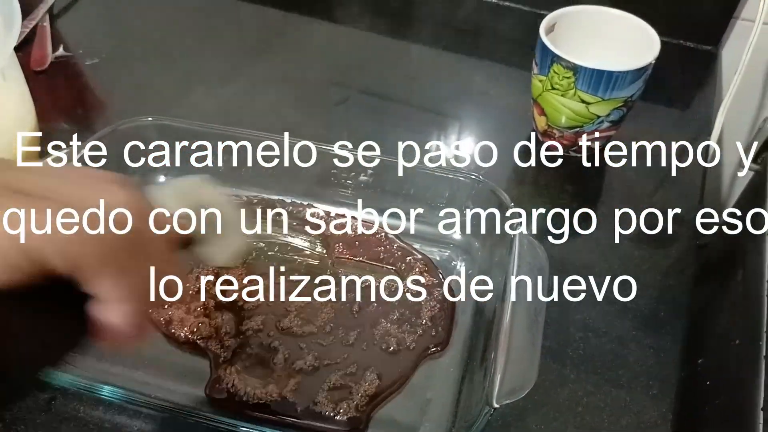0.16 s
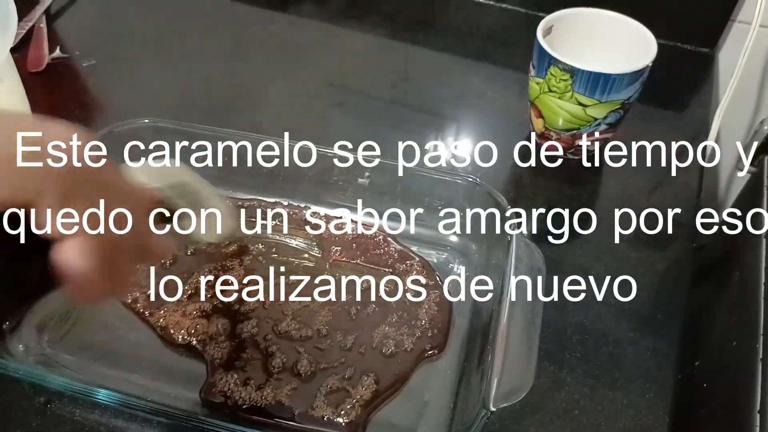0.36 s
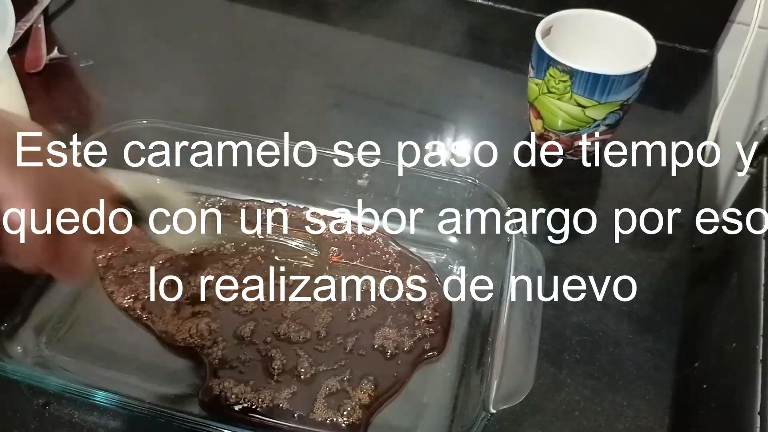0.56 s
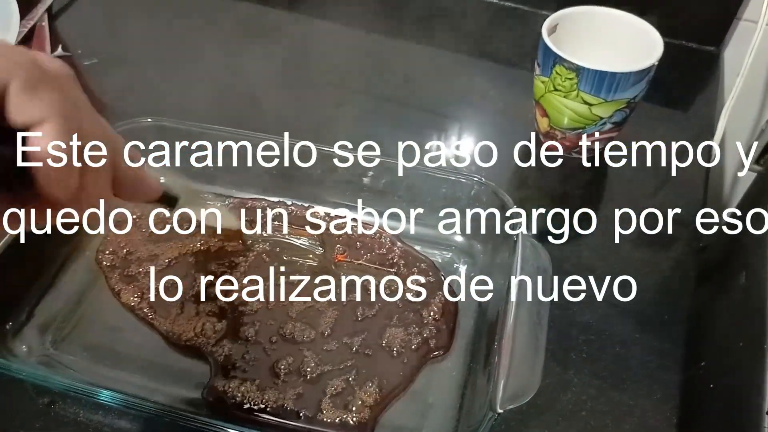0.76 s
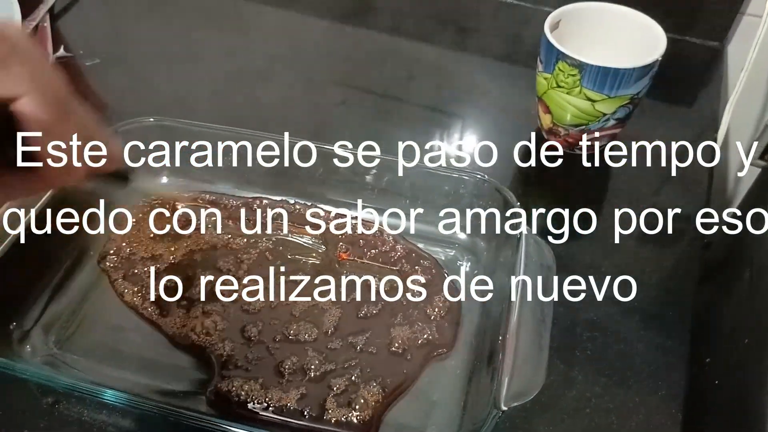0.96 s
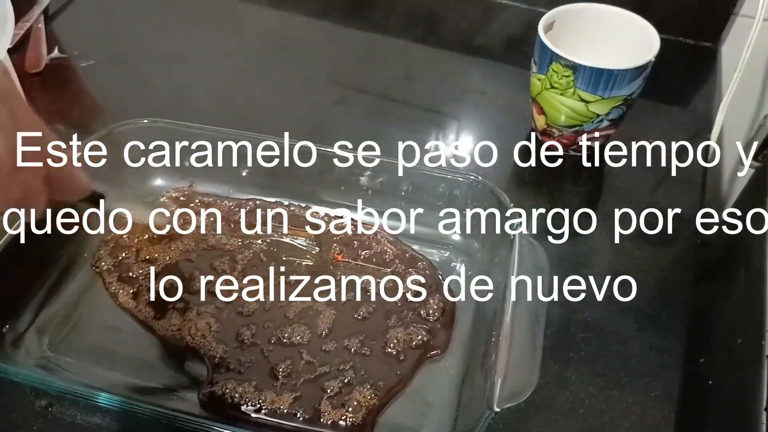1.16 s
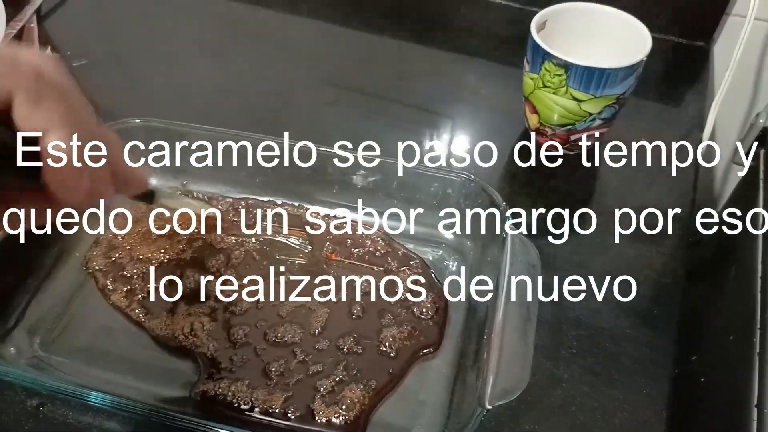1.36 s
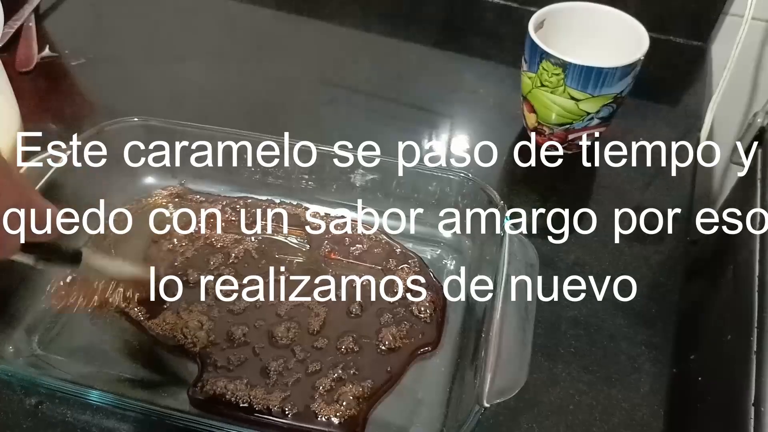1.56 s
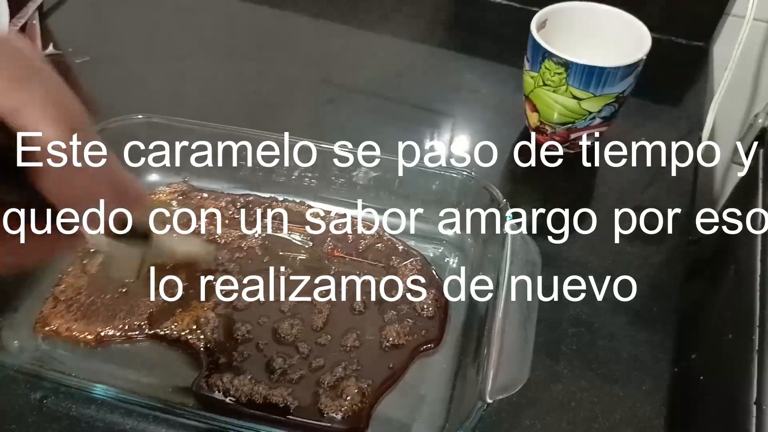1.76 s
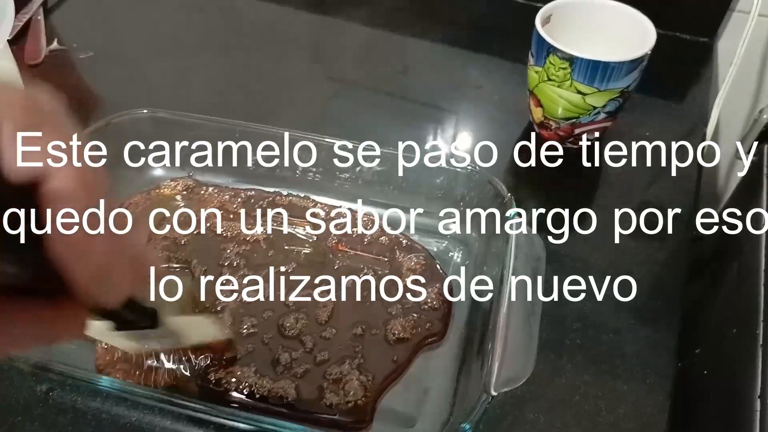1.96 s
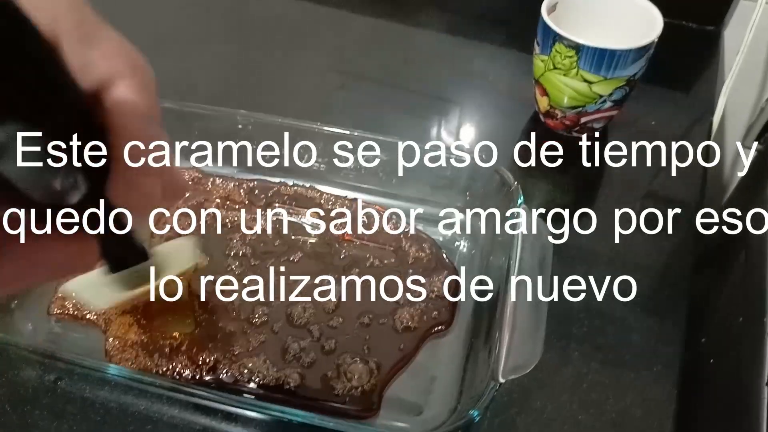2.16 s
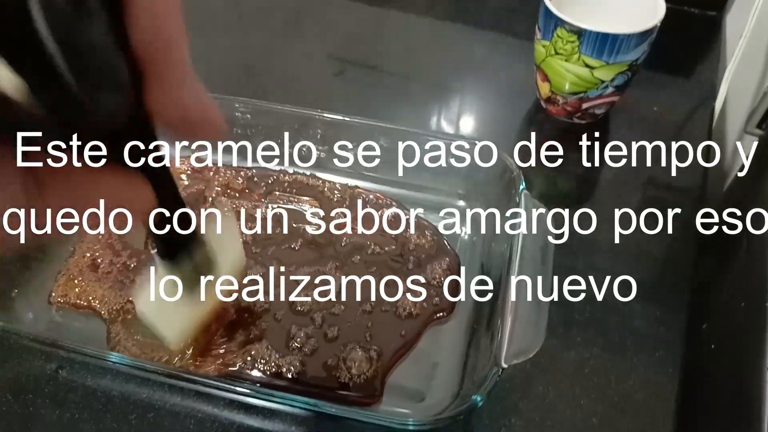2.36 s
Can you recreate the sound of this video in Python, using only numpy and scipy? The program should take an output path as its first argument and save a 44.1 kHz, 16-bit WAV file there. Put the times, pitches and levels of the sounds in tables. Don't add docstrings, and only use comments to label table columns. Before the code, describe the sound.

A spatula scrapes sticky caramel in a glass dish, with one loud early knock on the counter

```python
import sys
import numpy as np
from scipy import signal
from scipy.fft import rfft, irfft, next_fast_len
from scipy.io import wavfile
from scipy.ndimage import uniform_filter1d, map_coordinates

SR = 44100
rng = np.random.default_rng(int(sys.argv[2]) if len(sys.argv) > 2 else 0)


def magnitude_from_level(level_db):
    exponent = np.asarray(level_db, float) / 20
    return 10 ** exponent


def store_wav(level_fs):
    pcm = np.round(np.clip(np.atleast_2d(level_fs), -1, 1) * 32767)
    wavfile.write(sys.argv[1], SR, pcm.T.astype(np.int16))


N = 110250


def unit(x):
    return x / np.sqrt(np.mean(x ** 2) + 1e-20)


def seconds(length):
    return np.arange(length) / SR


def decay(t, t60):
    return magnitude_from_level(-60 * np.maximum(t, 0) / t60)


def along(points, hz):
    f, v = np.transpose(points)
    return np.interp(np.log(hz + 1), np.log(f + 1), v)


def colour(points):
    return lambda hz: magnitude_from_level(along(points[:-1], hz))


def wobble(rate_hz):
    knots = rng.standard_normal(int(N * rate_hz / SR) + 4)
    return map_coordinates(knots, [np.arange(N) * rate_hz / SR])


def filtered(x, response):
    m = next_fast_len(len(x) + 8192)
    return irfft(rfft(x, m) * response(np.fft.rfftfreq(m, 1 / SR)), m)[:len(x)]


def peak(f, centre, width):
    return 1j * f * width / (centre * centre - f * f + 1j * f * abs(width))


def add(track, start_s, sound):
    part = track[max(round(start_s * SR), 0):][:len(sound)]
    part += sound[:len(part)]


def streaky(x, depth_db):
    z = signal.stft(np.pad(x, (0, 512)), nperseg=512)[2]
    field = uniform_filter1d(rng.standard_normal(z.shape), 2, 0)
    field = uniform_filter1d(field, 22, 1)
    return signal.istft(z * magnitude_from_level(depth_db * unit(field)), nperseg=512)[1][:len(x)]


# (frequency [Hz], density [dB per Hz])
RUB_SPECTRUM = [(400, 5), (700, 4), (1300, -0.5), (2600, 3), (4500, -3), (6500, -5.5), (8000, -17),
                (13500, -6.5), (20000, -17)]


def rubbing():
    grain_per_s, spread_db, grain_db, flutter_db, streak_db = 300, 3, -3, 1.1, 0.6 * 4.5
    size_db = spread_db * np.minimum(rng.exponential(size=N), 2)
    grains = (rng.random(N) < grain_per_s / SR) * magnitude_from_level(size_db)
    grains = np.convolve(grains, magnitude_from_level(-np.arange(90) * 0.33))[:N] * rng.standard_normal(N)
    friction = rng.standard_normal(N) + magnitude_from_level(grain_db) * unit(grains)
    flutter = magnitude_from_level(flutter_db * (wobble(40.17) + wobble(130)))
    return streaky(filtered(friction, colour(RUB_SPECTRUM)) * flutter, streak_db)


# (start [s], rise [s], hold [s], level [dB], lowest frequency [Hz])
STROKES = [(0, 0.027, 0.026, -55.5, 2040), (0.133, 0.016, 0.011, -58, 1970),
           (0.153, 0.0018, 0.032, -46, 2040), (0.163, 0.013, 0.026, -46.5, 1390),
           (0.186, .02, 0.012, -48.5, 900), (0.415, 0.034, 0.29, -59.5, 2050),
           (0.825, 0.026, 0.03, -51.5, 1700), (0.899, 0.013, 0.1, -48, 1300),
           (1.025, 0.029, 0.013, -47, 1270), (1.123, 0.007, 0.043, -41.5, 1320),
           (1.259, 0.041, 0.062, -59, 2200), (1.409, 0.0072, 0.003, -48.5, 1530),
           (1.494, 0.009, 0.015, -46, 585), (1.514, 0.003, 0.082, -38, 1390),
           (1.516, 0.025, 0.079, -40, 507), (1.675, 0.01, 0.11, -56.5, 1910),
           (1.846, 0.029, 0.17, -52, 2170), (2.329, 0.015, 0.11, -69.5, 704),
           (1.953, 0.012, 0.076, -50.5, 1300), (2.105, 0.034, 0.17, -64, 1996),
           (2.321, 0.0052, 0.013, -54, 1420)]


def scrape():
    release_t60, linger_t60, linger_db, linger_low_hz, steepness = 0.29, 0.76, -25, 2000, 6.7
    rub = rubbing()
    out, t = np.zeros(N), seconds(SR * 3 // 4)
    for start_s, rise_s, hold_s, db, low_hz in STROKES:
        piece = np.pad(rub, (0, len(t)))[max(round(start_s * SR), 0):][:len(t)]

        def above(hz):
            return filtered(piece, lambda f: 1 / np.sqrt(1 + (hz / (f + 1)) ** (4 * steepness)))

        after_s = t - rise_s - hold_s
        stroke = above(low_hz) * decay(after_s, release_t60)
        linger = above(max(low_hz, linger_low_hz)) * magnitude_from_level(linger_db) * decay(after_s, linger_t60)
        attack = np.clip(t / max(rise_s, 0.002), 0, 1)
        add(out, start_s, magnitude_from_level(db) * attack * (stroke + linger) / np.std(rub))
    return out


# (start [s], length [s], frequency [Hz], width [Hz], level [dB])
SINGS = [(0.0, 0.04, 2710, 470, -69), (0.179, 0.059, 2570, 92, -47), (0.463, 0.31, 2947, 140, -60.5),
         (.5, 0.14, 2683, 100, -64.5), (.58, 0.12, 1668, 68, -71.5), (.34, 0.1, 3790, 60, -57.5),
         (1.39, 0.1, 1200, 130, -75.5), (0.551, 0.18, 2340, 56, -62), (0.592, 0.18, 4330, 850, -65.5),
         (.72, 0.12, 6800, 60, -81.5), (0.848, 0.23, 1760, 130, -56.5), (0.866, 0.043, 3330, 850, -49),
         (0.912, 0.029, 2264, 390, -44.5), (.915, 0.22, 631, 98, -57.5), (1.521, .04, 2180, 670, -46),
         (1.545, 0.019, 3300, 490, -36.5), (1.112, 0.035, 1767, 93, -49.5), (1.199, 0.13, 614, 40, -60),
         (1.135, 0.04, 2740, 1000, -48), (1.712, 0.017, 694, 62, -69), (0.574, 0.046, 726, 100, -65.5),
         (1.32, 0.036, 1536, 13, -74), (1.421, 0.26, 614, 78, -61), (1.69, 0.16, 1520, 78, -68.5),
         (2.03, 0.045, 1490, 50, -70.5), (1.852, 0.077, 2640, 220, -62), (1.939, 0.16, 623, 95, -75),
         (1.968, 0.021, 988, 93, -61), (1.969, 0.036, 1630, 43, -57.5), (2.1, 0.13, 2840, 370, -63.5),
         (2.146, 0.025, 2003, 20, -67), (2.208, 0.17, 2042, 30, -69), (2.34, 0.1, 609, 55, -64),
         (2.426, 0.06, 320, 74, -65.5), (0, .2, 306, 75, -76), (1.401, 0.13, 310, 60, -76),
         (1.501, 0.15, 1115, 540, -52.5)]


def singing():
    edge_s = 0.029
    out, t = np.zeros(N), seconds(SR * 3 // 4)
    for start_s, length_s, hz, width_hz, db in SINGS:
        tone = filtered(rng.standard_normal(len(t)), lambda f: peak(f, hz, width_hz) ** 2)
        shape = np.clip(t / edge_s, 0, 1) * decay(t - length_s, 8 * edge_s)
        add(out, start_s, magnitude_from_level(db) * shape * tone / np.std(tone[t < length_s]))
    return out


# (time [s], peak level [dB], frequency [Hz])
SLIPS = [(0.894, -67.5, 623), (0.922, -47, 649), (0.955, -44.5, 622), (0.982, -40.5, 621),
         (1.021, -36.5, 651), (1.081, -48, 675), (1.112, -54, 690), (1.168, -66, 674), (1.2, -63, 580),
         (1.23, -59, 629), (1.271, -53, 615), (1.298, -52.5, 671), (1.4, -79, 624)]


def slips():
    rise_s, t60 = 0.008, 0.1
    out, t = np.zeros(N), seconds(SR // 4)
    swell = magnitude_from_level(6.5) * decay(t, t60) * (1 - np.exp(-(t / rise_s) ** 2))
    for time_s, db, hz in SLIPS:
        add(out, time_s - rise_s, magnitude_from_level(db) * swell * np.sin(2 * np.pi * hz * t))
    return out


def crackle_burst():
    t = seconds(SR // 20)
    return np.diff(rng.standard_normal(len(t) + 1)) * decay(t, 0.005)


# (time [s], peak level [dB], pitch [Hz])
SNAPS = [(0.0643, -42, 3150), (0.1539, -32, 3020), (0.1614, -32, 2400), (0.189, -28, 2510),
         (0.21, -33, 3900), (0.8525, -39, 3160), (0.8804, -38, 3200), (0.9194, -37, 2210),
         (0.9382, -29, 2230), (1.0519, -27, 1800), (1.1242, -29, 1800), (1.1437, -24, 3130),
         (1.2979, -44, 2960), (1.4121, -40, 2880), (1.5238, -25, 2330), (1.5319, -22, 2440),
         (1.5484, -19, 1500), (1.5814, -25, 2770), (1.582, -25, 4000), (1.6254, -28, 3300),
         (1.597, -26, 1700), (1.065, -33, 1800), (1.699, -42, 2500), (1.7379, -42, 3220),
         (1.7464, -46, 1470), (1.9419, -32, 3030), (2.142, -40, 2750), (2.1977, -47, 3020),
         (2.2311, -48, 2540), (1.0324, -36, 2190), (.8877, -41, 1780), (1.607, -28, 3600),
         (2.2974, -48, 2010), (2.3291, -40, 2660), (2.3869, -46, 2240)]


def snaps():
    rise_cycles, t60_cycles, lag_s, gain_db, crack_db = 1.2, 30, 0.0005, 3, -16
    out, t = np.zeros(N), seconds(SR // 20)
    for time_s, db, hz in SNAPS:
        rise = np.sin(np.pi / 2 * np.clip(t * hz / rise_cycles, 0, 1)) ** 2
        ring = np.sin(2 * np.pi * hz * t) * decay(t, t60_cycles / hz) * rise
        add(out, time_s + lag_s, magnitude_from_level(db + gain_db) * (ring + magnitude_from_level(crack_db) * crackle_burst()))
    return filtered(out, lambda f: peak(f, 3700, 5500) * peak(f, 3700, 6500))


def bubble_ticks():
    ticks_per_s, level_db, spread_db = 45, -66, 3.68
    ticks = (rng.random(N) < ticks_per_s / SR) * magnitude_from_level(level_db + spread_db * rng.standard_normal(N))
    return filtered(np.convolve(ticks, crackle_burst())[:N], lambda f: peak(f, 9000, 12000) ** 2)


# (time [s], peak level [dB], centre frequency [Hz])
PRICKS = [(.0655, -48, 5500), (.4294, -40, 5400), (.583, -49.5, 11000), (.9555, -34, 13160),
          (.977, -33.5, 13940), (.984, -41.5, 9000), (1.0155, -42, 6000), (1.051, -60, 13000),
          (1.1262, -32, 5860), (1.1318, -42, 6460), (1.165, -46, 12170), (1.414, -47, 9060),
          (1.423, -44, 11860), (1.70, -36, 4460), (1.709, -40.5, 4000), (1.739, -42, 5360),
          (1.847, -59, 12150), (2.03, -49.5, 7360), (2.046, -44, 10930), (2.14, -62.5, 5960),
          (2.24, -55, 10900), (2.2985, -49.5, 11000), (2.34, -49, 11000), (2.39, -54, 10900)]


def pricks():
    t60, relative_width = 0.008, 0.6
    out, t = np.zeros(N), seconds(SR // 30)
    for time_s, db, hz in PRICKS:
        noise = rng.standard_normal(len(t)) * decay(t, t60)
        burst = filtered(noise, lambda f: peak(f, hz, relative_width * hz) ** 2)
        add(out, time_s, magnitude_from_level(db) * burst / np.abs(burst).max())
    return out


# (frequency [Hz], density [dB per Hz])
THUD_SPECTRUM = [(35, -51.5), (70, -10.5), (170, -6.5), (300, -15.5), (700, -6), (1050, -18.5), (3000, -24),
                 (6500, -27.5), (8000, -43), (20000, -50)]
# (frequency [Hz], t60 [s])
KITCHEN_T60 = [(70, .33), (200, 0.65), (600, 0.41), (1300, 0.48), (2500, 0.43), (4500, 0.26), (6500, 0.32),
               (15000, 0.25)]


def kitchen_echo(t):
    hold_s, build_s = 0.0073, 0.006
    hz, u, z = signal.stft(rng.standard_normal(len(t)), SR, nperseg=256)
    z = z * decay(u - hold_s, along(KITCHEN_T60, hz)[:, None])
    tail = filtered(signal.istft(z, SR, nperseg=256)[1][:len(t)], colour(THUD_SPECTRUM))
    return (1 - np.exp(-t / build_s)) * tail / np.std(tail[:1500])


# (frequency [Hz], level [dB], t60 [s])
COUNTER_MODES = [(179.5, -5.5, 0.5), (252.4, -2, 0.39), (334.4, -4.5, 0.24), (380.7, -10.5, 0.35),
                 (489, -3, 0.34), (566, -10.5, 0.56), (645, -5, 0.57), (738, -0.5, 0.081), (826, -3, 0.46),
                 (914, -13.5, 0.27), (1256, -12, 0.19), (1293, -4.5, 0.48), (1740, 0, 0.072),
                 (2710, -1.5, 0.036)]


def counter_ring(t):
    body_hz, body_db, body_t60 = 665, 7, 0.11
    ring = magnitude_from_level(body_db) * decay(t, body_t60) * np.sin(2 * np.pi * body_hz * t)
    for hz, db, t60 in COUNTER_MODES:
        wander = 1.2 * np.cumsum(rng.standard_normal(len(t))) / 100
        ring += magnitude_from_level(db) * decay(t, t60) * np.sin(2 * np.pi * hz * t + wander)
    return -ring


# (frequency [Hz], width [Hz], level [dB])
DISH_MODES = [(1300, 50, -39.5), (1700, 96, -45.5), (900, 62, -42.5), (6170, 970, -50), (624, 34.8, -41)]


def dish_after_ring(t):
    ring = np.zeros(len(t))
    for hz, width_hz, db in DISH_MODES:
        ring += magnitude_from_level(db) * unit(filtered(rng.standard_normal(len(t)), lambda f: peak(f, hz, width_hz) ** 2))
    return ring * decay(t, 0.88) * decay(t - 0.4, 0.19)


def knock():
    start_s, rise_s, level_db, crack_db, crack_t60 = 0.2385, 0.0014, -17, 5, 0.009
    gate_s, gate_t60 = 0.56, 0.16
    out, t = np.zeros(N), seconds(SR)
    crack = filtered(rng.standard_normal(SR) * decay(t, crack_t60),
                     lambda f: peak(f, 2700, 2900) * peak(f, 4500, 7200) * peak(f, 3000, 5000))
    blow = kitchen_echo(t) + counter_ring(t) + magnitude_from_level(crack_db) * 5 * crack
    blow *= magnitude_from_level(level_db) * decay(t + start_s - gate_s, gate_t60)
    add(out, start_s, np.clip(t / rise_s, 0, 1) * (blow + dish_after_ring(t)))
    return out


# (frequency [Hz], level [dB rms])
HUM = [(59.3, -55.5), (116, -76), (44.2, -74.5)]


def mains_hum():
    t, hum = seconds(N), np.zeros(N)
    for k, (hz, db) in enumerate(HUM):
        hum += np.sqrt(2) * magnitude_from_level(db + k * 1.6 * wobble(22)) * np.sin(2 * np.pi * hz * t)
    return hum * magnitude_from_level(0.7 * wobble(25))


# (frequency [Hz], density [dB per Hz])
AIR_SPECTRUM = [(35, -22.5), (70, 7), (190, -15.5), (400, -17.5), (1100, -28), (2700, -12.5), (7800, -43.5),
                (13000, -33), (20000, -26)]


def room_air():
    level_db, patch_db = -65, 0.5
    air = streaky(rng.standard_normal(N), patch_db)
    return magnitude_from_level(level_db) * unit(filtered(air, colour(AIR_SPECTRUM)))


def scene():
    dish = scrape() + singing() + slips()
    syrup = snaps() + bubble_ticks() + pricks()
    return (dish + syrup + knock() + mains_hum() + room_air())[None]


def top_cut(x):
    return signal.sosfilt(signal.butter(12, 16820, fs=SR, output="sos"), x)


def record(dry):
    port_hz, port_width_hz, port_db, top_hz, ceiling, fade_s = 16000, 490, 12.5, 15850, 0.8, 0.02

    def microphone(f):
        port = 1 + magnitude_from_level(port_db) * peak(f, port_hz, port_width_hz)
        return port * np.where(f < top_hz, 1, 0.02) * peak(f, 820, 18000)

    x = filtered(dry[0], microphone)
    x = x / (1 + np.abs(x / ceiling) ** 4) ** (1 / 4)
    x = x * np.clip((N - np.arange(N)) / (fade_s * SR), 0, 1)
    return top_cut(x[None])


dry = scene()
out = record(dry)
store_wav(out)
```